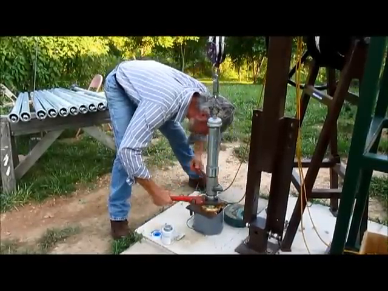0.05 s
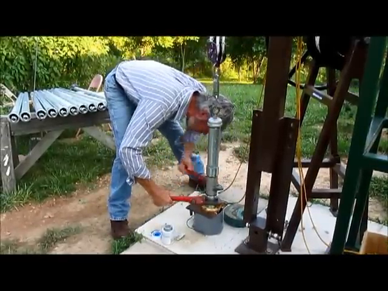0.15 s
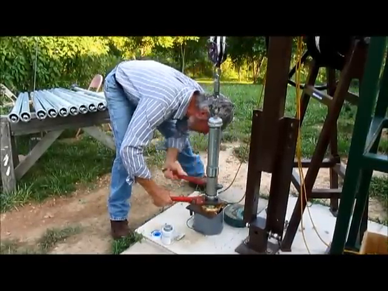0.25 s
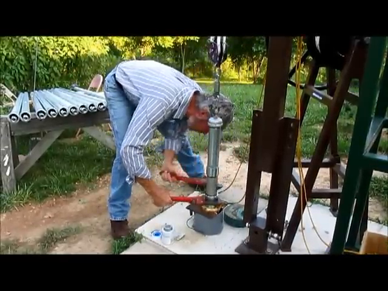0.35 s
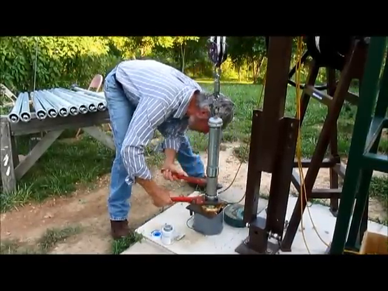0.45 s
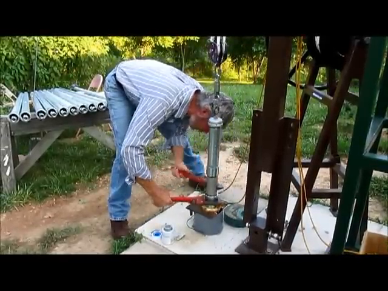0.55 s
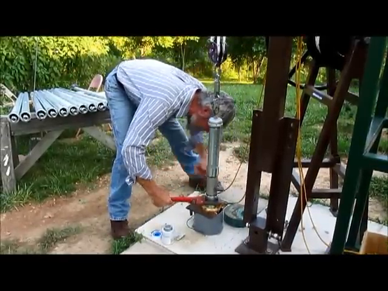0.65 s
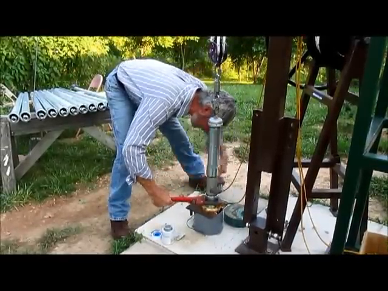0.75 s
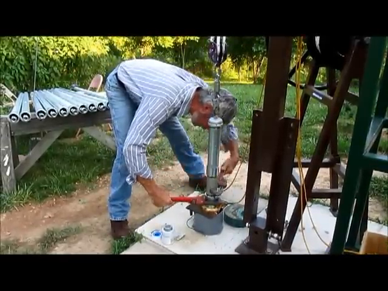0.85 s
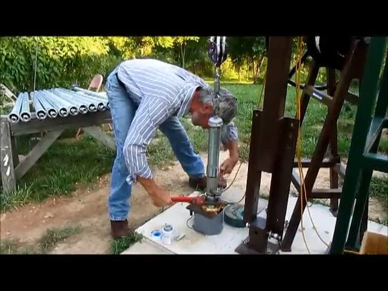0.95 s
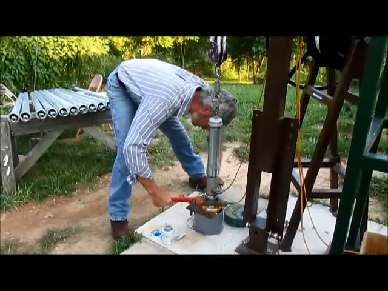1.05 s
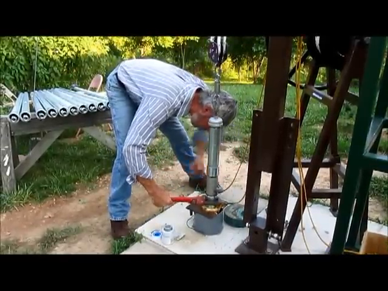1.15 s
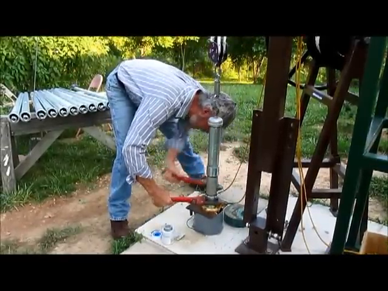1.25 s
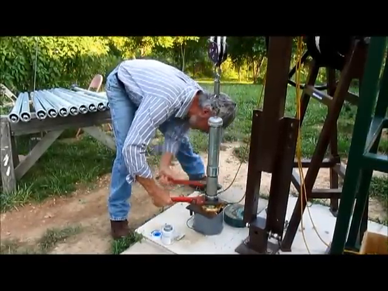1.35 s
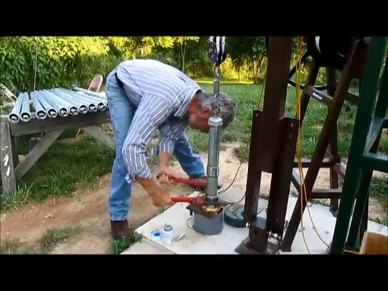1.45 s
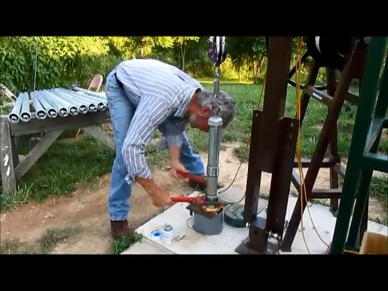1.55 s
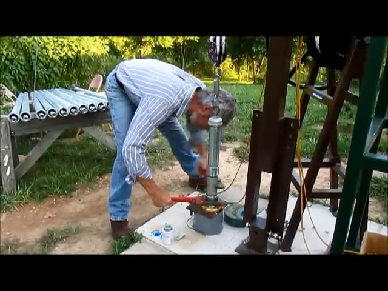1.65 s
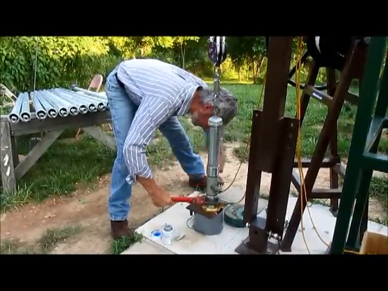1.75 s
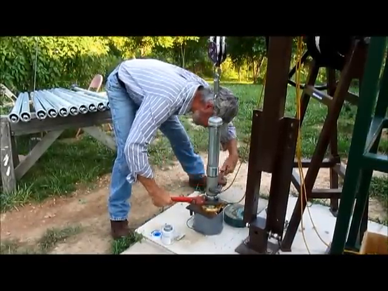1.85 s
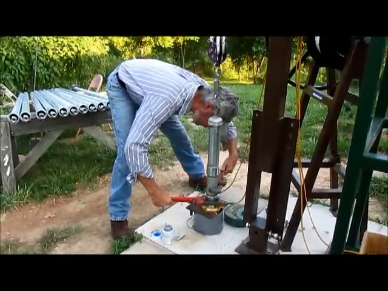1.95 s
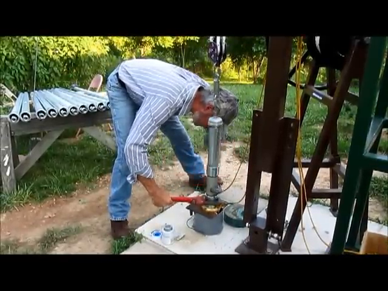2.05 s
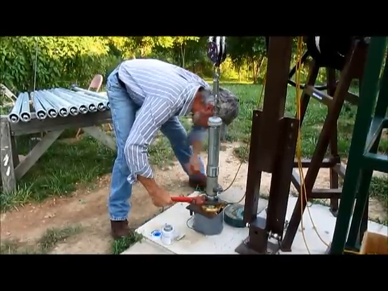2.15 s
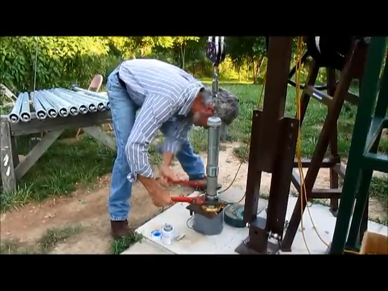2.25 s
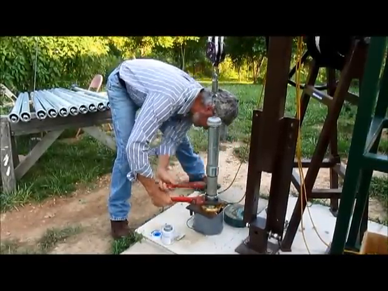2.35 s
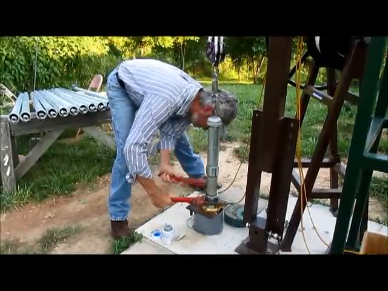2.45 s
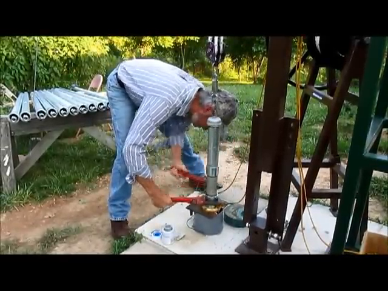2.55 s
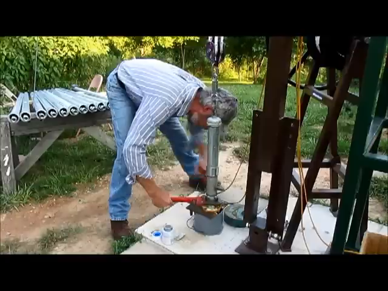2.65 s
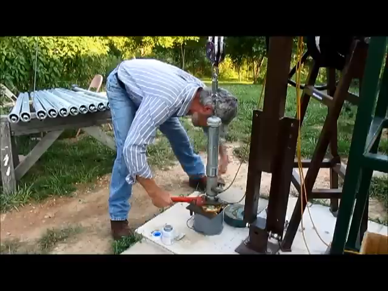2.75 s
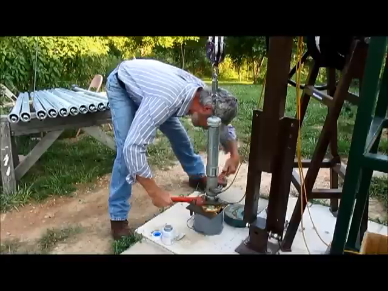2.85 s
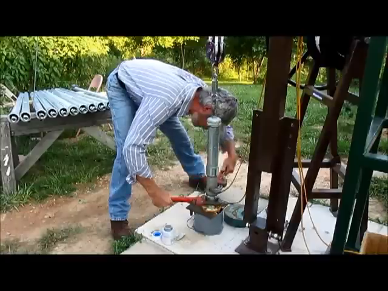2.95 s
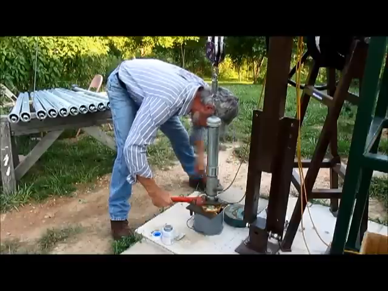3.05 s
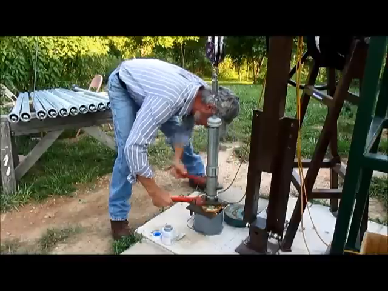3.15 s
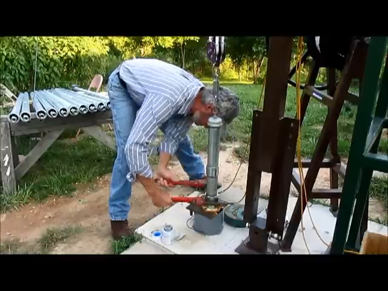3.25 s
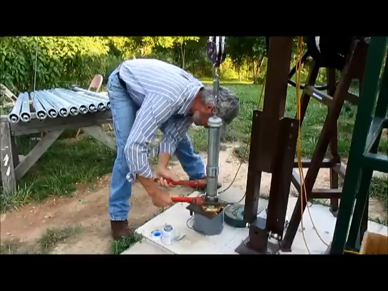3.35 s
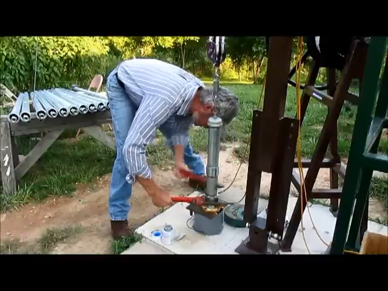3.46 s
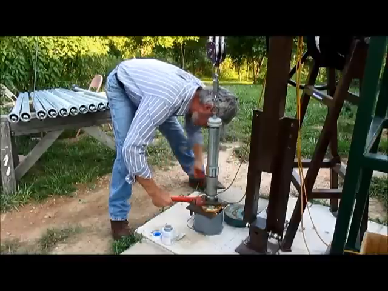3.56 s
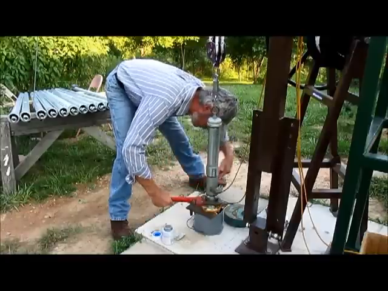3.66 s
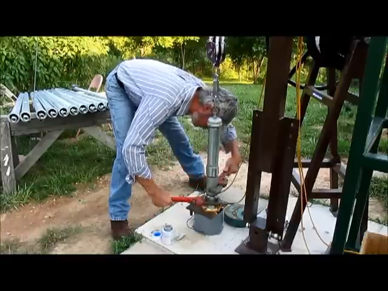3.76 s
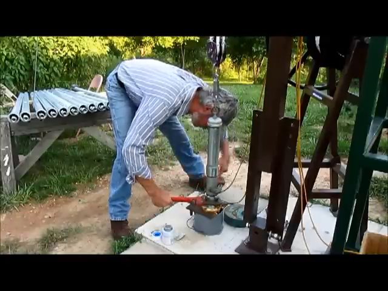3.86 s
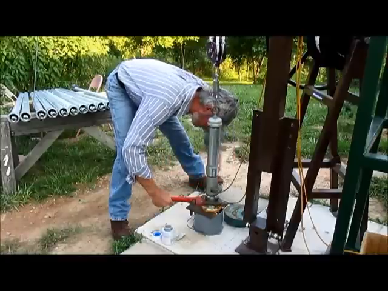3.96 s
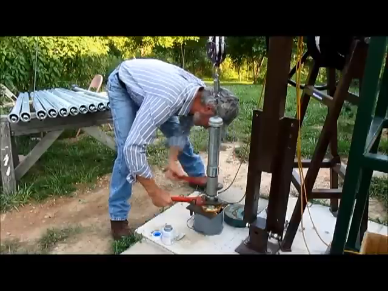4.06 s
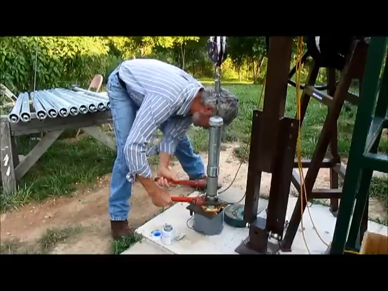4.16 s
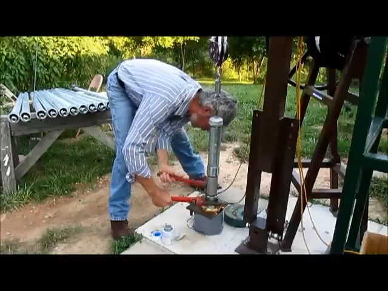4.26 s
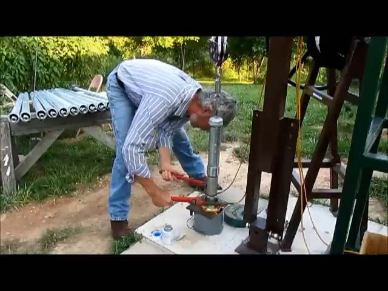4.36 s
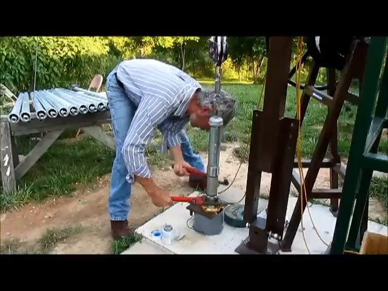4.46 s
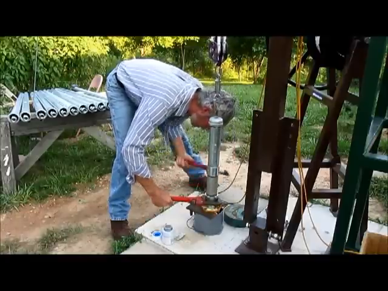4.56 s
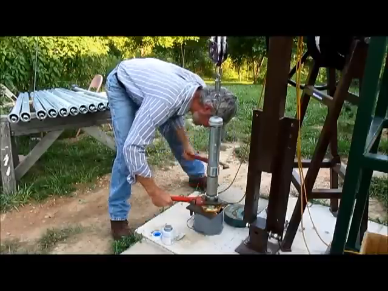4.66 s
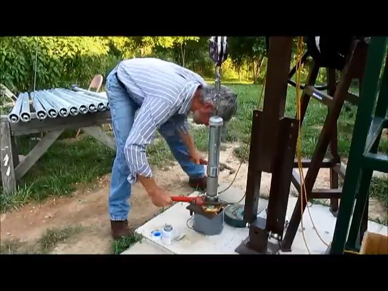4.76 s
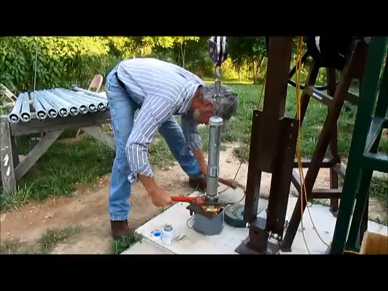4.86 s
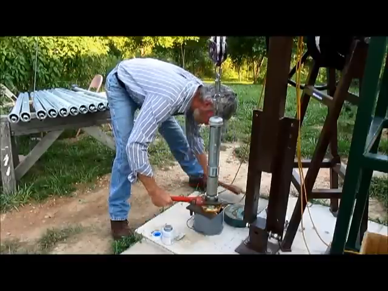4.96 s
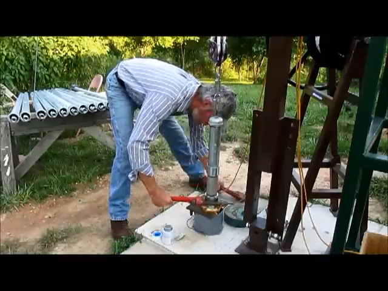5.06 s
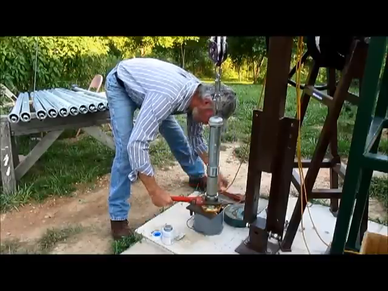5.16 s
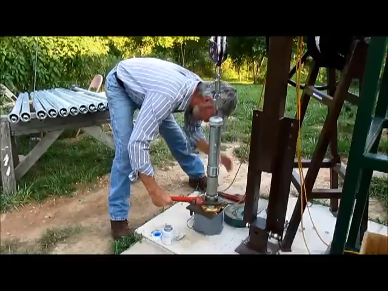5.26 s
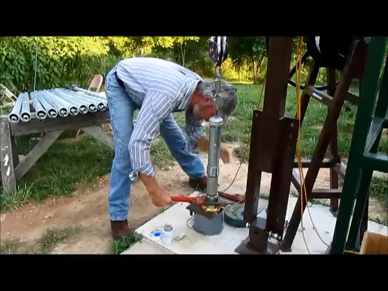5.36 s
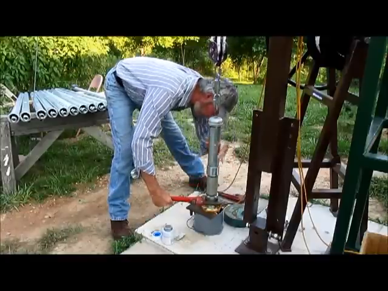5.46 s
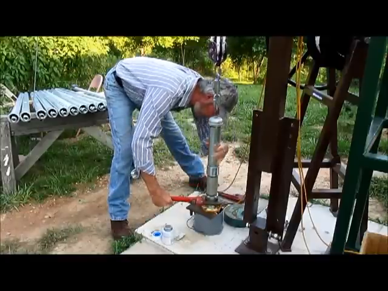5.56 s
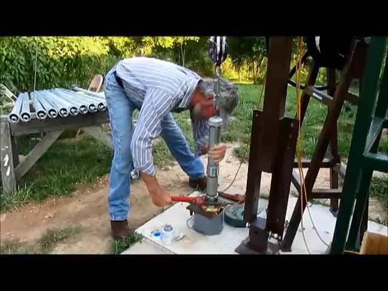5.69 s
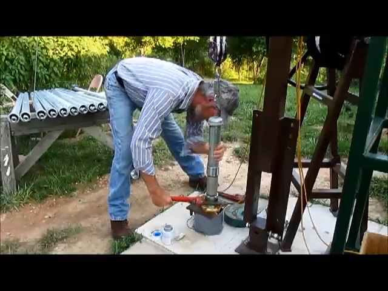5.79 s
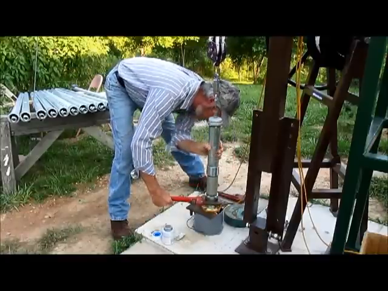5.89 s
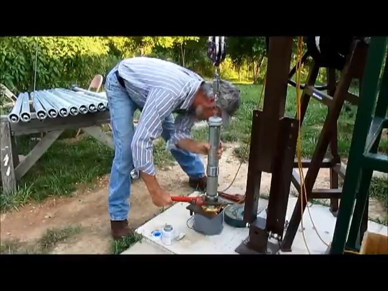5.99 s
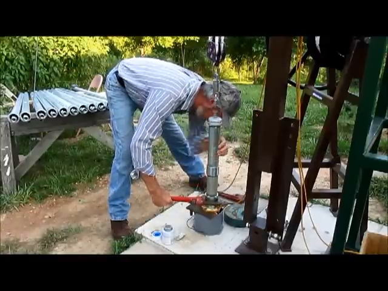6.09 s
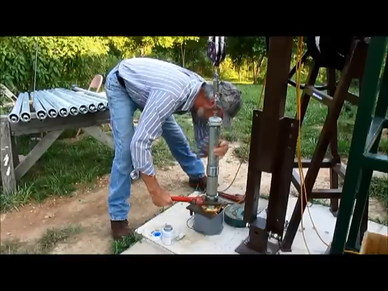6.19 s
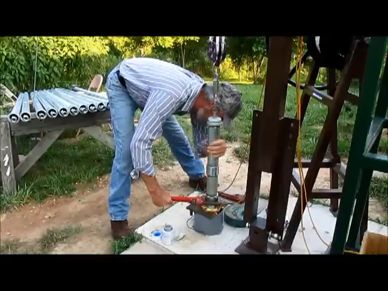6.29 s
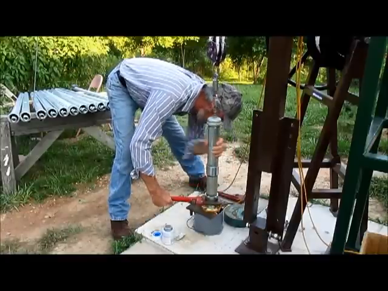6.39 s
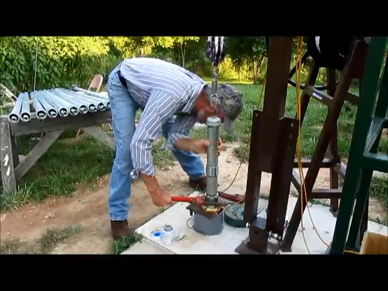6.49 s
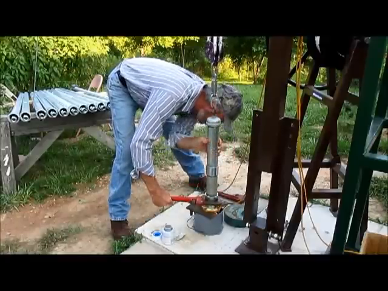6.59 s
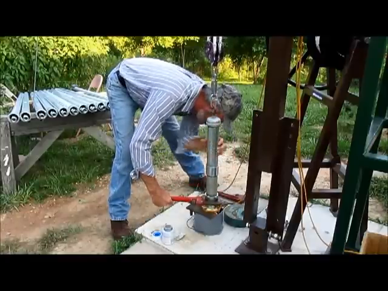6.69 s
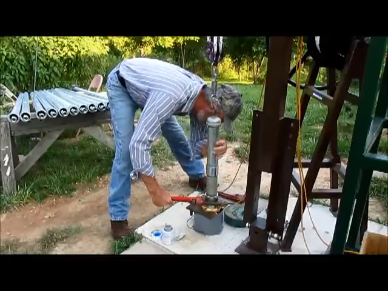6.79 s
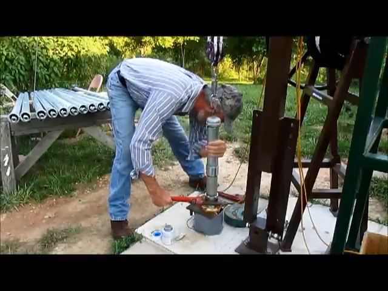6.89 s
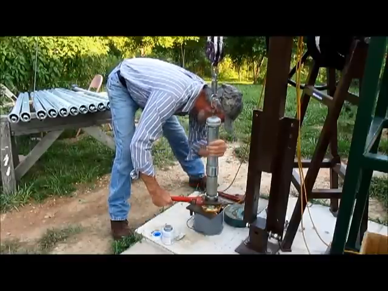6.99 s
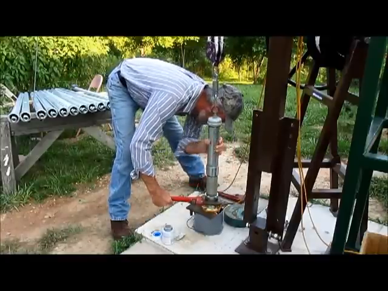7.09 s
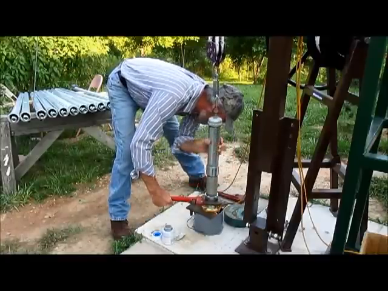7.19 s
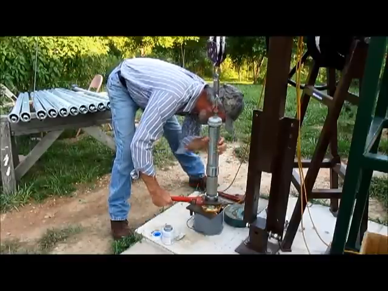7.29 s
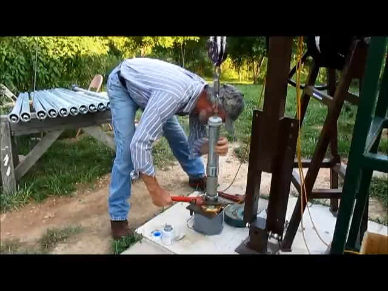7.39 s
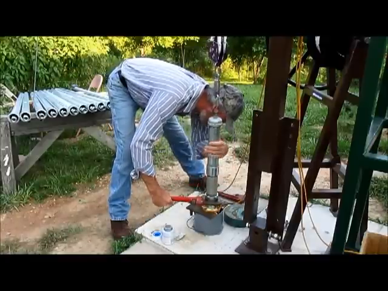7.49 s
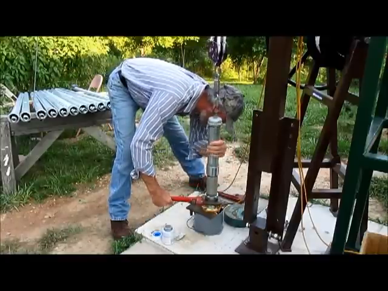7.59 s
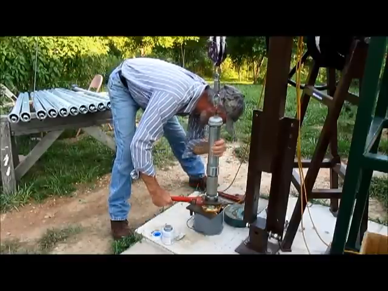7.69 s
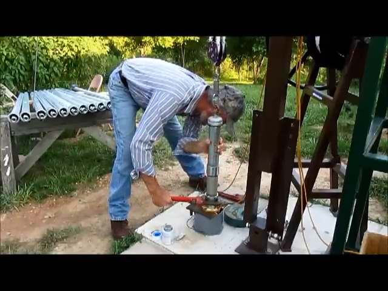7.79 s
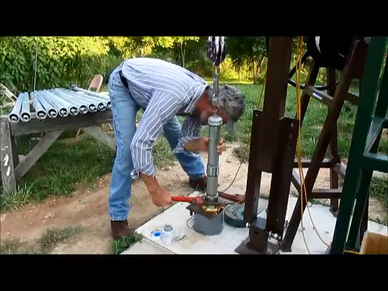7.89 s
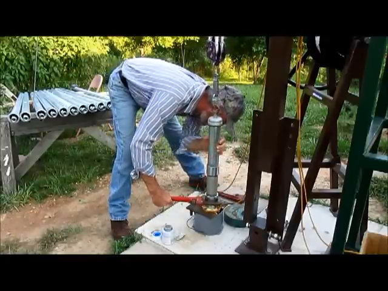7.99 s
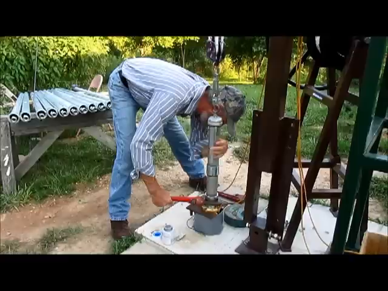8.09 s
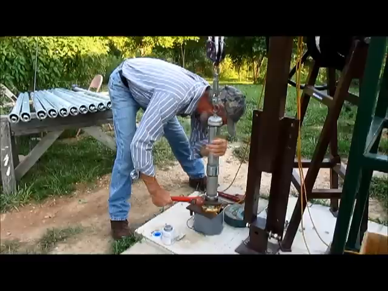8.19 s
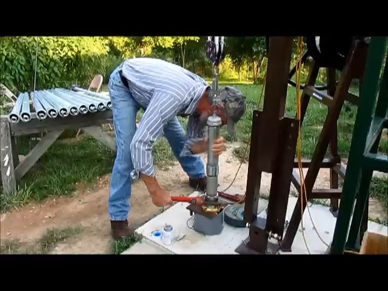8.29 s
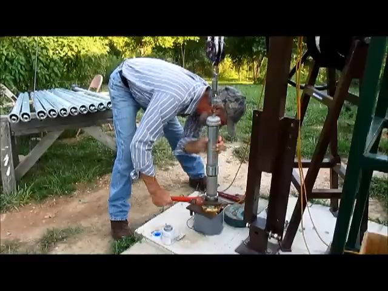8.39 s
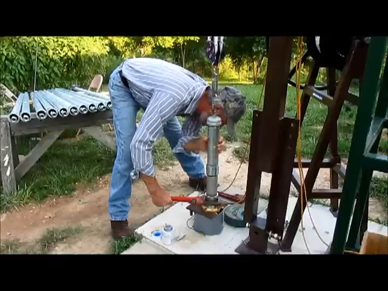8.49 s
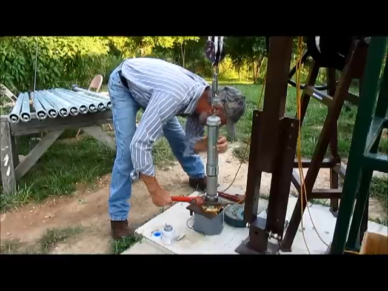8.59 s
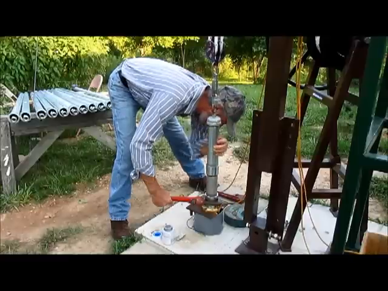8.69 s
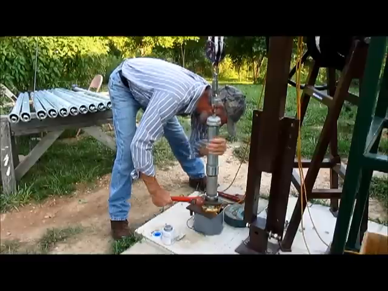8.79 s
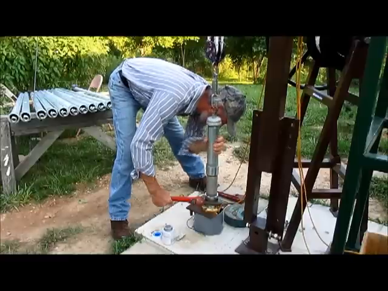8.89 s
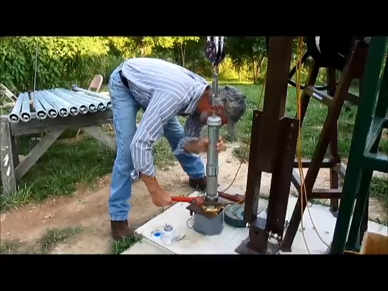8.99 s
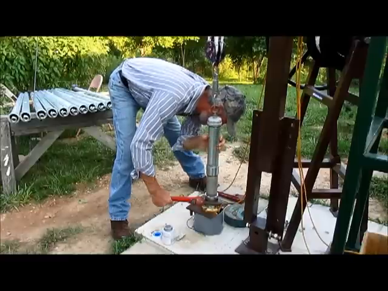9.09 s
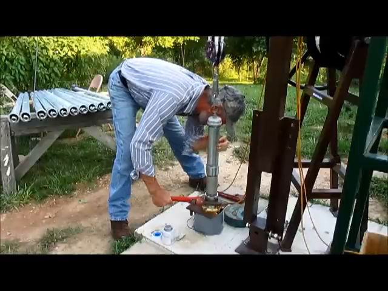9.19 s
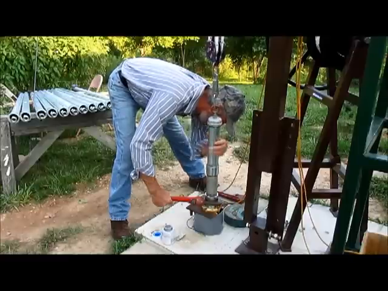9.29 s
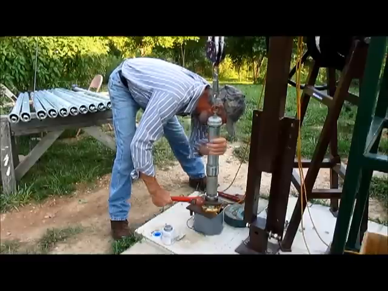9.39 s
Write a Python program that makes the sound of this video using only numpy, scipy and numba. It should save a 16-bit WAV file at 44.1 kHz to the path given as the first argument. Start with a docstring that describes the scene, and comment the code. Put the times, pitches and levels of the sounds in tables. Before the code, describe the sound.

A pipe wrench knocks and rasps round a steel pipe, drops clattering on concrete, then threads scrape softly until a fitting clanks free amid crickets.

```python
"""A pipe wrench is swung four times round a steel well pipe, a brief fifth drag following: noise bursts
through the clamped steel's resonances give the knocks, stick-slip impulses the rasp of the jaws.
It is dropped on a concrete slab, as coloured noise with decaying modes; then a loose fitting is turned
by hand, its threads rubbing as stick-slip friction until it clanks free. Crickets trill as pulsed tones
over noise bands of insects and open air. The gain ducks at loud peaks and creeps back."""
import sys
import numpy as np
from scipy import signal
from scipy.fft import rfft, irfft, next_fast_len
from scipy.io import wavfile
from numba import njit

SR = 44100
rng = np.random.default_rng(int(sys.argv[2]) if len(sys.argv) > 2 else 0)


def wav_out(sig):
    """Save sig, one row per channel (or a flat mono array), as 16-bit PCM at SR to the path in sys.argv[1]."""
    wavfile.write(sys.argv[1], SR, np.round(np.clip(np.atleast_2d(sig).T, -1, 1) * 32767).astype(np.int16))


N = 416289
T = np.arange(N) / SR  # s

# resonances of the wrench clamped on the pipe: f/Hz, bandwidth/Hz, level/dB
CLAMPED_MODES = [(177, 10, -3.5), (238, 30, -0.5), (413, 26, 1.5), (497.4, 34, 7), (770, 120, 6.5),
                 (963, 59, 2.5), (1040, 49, 0), (1272, 120, -7), (1840, 42, -3), (2420, 73, -1.5),
                 (2620, 230, -12), (3120, 85, -13.5), (3695, 110, -11), (4770, 44, -11), (4820, 64, -5.5),
                 (6000, 46, -7), (6650, 160, -2.5)]
# spectrum of the contact force between jaws and pipe: f/Hz, level/dB
CONTACT_SPECTRUM = [(30, -34), (90, -8), (200, 2.5), (500, 2.5), (1500, -1), (3000, -0.5), (5000, 0.5),
                    (7000, -10), (9500, -13.5), (12000, -19.5), (16000, -21)]
# resonances of the rubbing threads: f/Hz, bandwidth/Hz, level/dB
THREAD_MODES = [(79.4, 6.5, -11), (236, 66, -2.5), (484, 96, 2.5), (755, 85, -1.5), (1013, 220, -0.5),
                (1189, 82, 8), (1720, 46, -21), (1780, 27, -3), (2940, 290, 0.5), (3600, 36, -2),
                (4010, 59, -4), (4810, 130, -7)]
# resonances of the loose pipe: f/Hz, bandwidth/Hz, level/dB
PIPE_MODES = [(1011, 8.1, 0.5), (2134, 10.6, -1.5), (2914, 11, -1), (3680, 13, -5)]


def undb(db):
    """Amplitude ratio from decibels: 20 dB for each factor of ten."""
    return 10 ** (np.asarray(db) / 20)


def unit(x):
    """Normalisation to a root-mean-square of 1."""
    return x / np.sqrt(np.mean(x ** 2))


def blow(x, db):
    """Energy scaling: the pulse carries as much energy as 10 ms at this level."""
    return x * undb(db) / np.sqrt(np.sum(x ** 2) / (.01 * SR))


def add(track, s, x):
    """Superposition: adds x to the track from s seconds on."""
    i = int(s * SR)
    track[i:i + len(x)] += x[:N - i]


def colour(x, points):
    """Minimum-phase filter through (f/Hz, level/dB) points, made causal by folding the cepstrum."""
    hz, db = np.transpose(points)
    size = next_fast_len(len(x) + 2048, True)
    size += size % 2
    grid_hz = np.arange(size // 2 + 1) * SR / size
    magnitude = undb(np.interp(np.log(grid_hz + 1), np.log(hz), db))
    cepstrum = irfft(np.log(magnitude))
    cepstrum[1:size // 2] *= 2
    cepstrum[size // 2 + 1:] = 0
    response = np.exp(rfft(cepstrum))
    return irfft(rfft(x, size) * response)[:len(x)]


def band(x, hz, kind):
    """Third-order Butterworth filter: low-, high- or band-pass."""
    return signal.sosfilt(signal.butter(3, hz, kind, fs=SR, output="sos"), x)


def resonate(x, modes, direct_db):
    """Modal response: a force excites parallel resonances and is partly heard directly."""
    out = undb(direct_db) * x
    for hz, width, db in modes:
        b, a = signal.iirpeak(hz, hz / width, fs=SR)
        out = out + undb(db) * signal.lfilter(b, a, x)
    return out


def walk(rate):
    """Slow random modulation: Gaussian knots, rate per second, joined by lines, with a spread near 1."""
    knots = rng.standard_normal(4096)
    return 1.2 * np.interp(T * rate, np.arange(len(knots)), knots)


def slips(rate, spread_db):
    """Stick-slip friction: tiny releases of uneven size at random moments, rate per second."""
    sizes = undb(spread_db * np.minimum(rng.exponential(size=N), 4))
    released = rng.random(N) < rate / SR
    return unit(released * sizes * rng.standard_normal(N))


def surround(points, trim_hz, flicker_db, flicker_rate):
    """Diffuse field: separate mid and side noises, each wavering; the side is slightly less below trim_hz."""
    mid, side = (colour(rng.standard_normal(N), points) * undb(flicker_db * walk(flicker_rate))
                 for _ in range(2))
    low_side = signal.sosfilt(signal.butter(1, trim_hz, fs=SR, output="sos"), side)
    side = side - 0.07 * low_side
    return unit(mid + 0.79 * side * np.array([[1], [-1]]))


def place(x, lag_us, pan_db):
    """Interaural localisation: the left channel lags by lag_us and is pan_db louder than the right."""
    size = next_fast_len(N + 64, True)
    delay = np.exp(-2j * np.pi * np.fft.rfftfreq(size, 1 / SR) * lag_us / 1e6)
    late = irfft(rfft(x, size) * delay, size)[:N]
    return np.array([late * undb(pan_db / 2), x * undb(-pan_db / 2)])


def cricket(stroke_hz, pitch_hz, glide_hz, pulse_s, closing, scatter_db):
    """Stridulation: wings open and close, and each pass of the file sounds a short falling pulse."""
    cycle = np.cumsum(stroke_hz * (1 + 0.02766 * walk(14))) / SR
    out = 0
    for offset in (0, closing):  # in wing cycles
        age = ((cycle + offset) % 1 - .5) / stroke_hz / pulse_s  # in pulse widths
        hz = pitch_hz - glide_hz * np.clip(age, -2, 2) + 45 * walk(60)
        tone = np.sin(2 * np.pi * np.cumsum(hz) / SR)
        out = out + np.exp(-.5 * age ** 2) * tone * undb(scatter_db * walk(40))
    return unit(out)


def insects():
    """Incoherent sum: two near crickets over a wide chorus, and a lower buzz that sinks near the end."""
    # nearest cricket, which falters early on and then holds: t/s, level/dB
    near_level = [(0, -44.5), (.5, -53.5), (1.3, -55), (1.7, -46.5), (5, -47.5), (6.2, -44.5), (6.8, -46.5),
                  (9.4, -46)]
    # spectrum of the distant crickets: f/Hz, relative spectral density/dB
    chorus_spectrum = [(5800, -25), (6600, -12.5), (7000, -4.5), (7250, 3.5), (7480, -9.5), (7750, 0),
                       (7890, -6), (8020, -0.5), (8250, -4), (8600, -13.5), (9200, -20), (9800, -39)]
    # spectrum of the lower insect buzz: f/Hz, relative spectral density/dB
    buzz_spectrum = [(2700, -13.5), (3200, -1), (3480, 4.5), (3800, -4.5), (4600, -1.5), (5300, 4),
                     (5700, 1), (6400, 5), (7500, -41), (9000, -43)]
    near = cricket(stroke_hz=23.5, pitch_hz=7510, glide_hz=70, pulse_s=.0021, closing=.44, scatter_db=2)
    other = cricket(stroke_hz=36.6, pitch_hz=7470, glide_hz=60, pulse_s=.002, closing=.5, scatter_db=4)
    chorus = surround(chorus_spectrum, trim_hz=500, flicker_db=1.0, flicker_rate=99)
    buzz = surround(buzz_spectrum, trim_hz=800, flicker_db=0.8, flicker_rate=60)
    buzz_db = -53.0 - 10 * np.clip((T - 8.72) / 0.071, 0, 1)
    near = near * undb(np.interp(T, *np.transpose(near_level)))
    return (place(near, lag_us=23.2, pan_db=0.0) + other * undb(-51.5)
            + chorus * undb(-46.5) + buzz * undb(buzz_db))


def knocks(low_db=-8, middle_db=-7, high_db=-8, tail_db=-22, tail_s=0.029, rise_s=0.00078,
           ring_s=0.001, ring_db=-5, ring_db_per_ms=2.5, thinnest_hz=170):
    """Impact excitation: teeth crunch into the clamped steel, then the loose jaw rattles faintly."""
    # knocks on the pipe: t/s, middle-band level/dB before the offset middle_db,
    # low and high bands relative to it/dB before their offsets, ring f/Hz, contact decay/ms
    strikes = [(0.597, -21, 0, -14, 1430, 4.9), (0.8162, -24, -1, -26, 3270, 2.4),
               (0.8605, -16, -9, -4, 2460, 14), (0.9324, -23, 5, -4, 3520, 2.8),
               (0.9472, -30, 11, 5, 794, 5.2), (1.0, -30, 2.5, -6, 3720, 4.2),
               (1.5755, -32.5, -4.5, 0, 1260, 3.9), (1.6329, -18, -14, -4.5, 2430, 8.2),
               (1.653, -14, -12, -5.5, 2470, 7.7), (1.7762, -31.5, -5, 0, 3600, 4),
               (1.8225, -17.5, 5, -6, 830, 11.6), (1.8862, -23, 1, -3, 2480, 5.9),
               (1.8943, -18.5, -15, -8, 2390, 6), (1.9493, -18.5, -8, -2.5, 1580, 4.4),
               (1.966, -23, 5.5, -13, 1220, 4), (2.4778, -24, -9.5, -3.5, 3580, 3.4),
               (2.6273, -22.5, -11.5, -4, 2402, 9.2), (2.7408, -28.5, 2.5, -12, 2455, 4.4),
               (2.857, -21, -8, -16, 2434, 3.7), (2.9108, -20, -18, -5.5, 2350, 18),
               (2.94, -19.5, -8.5, -3, 2523, 19), (3.5406, -22, -8, -2, 2347, 15),
               (3.6576, -28.5, 5, -14, 1170, 4), (3.6738, -26, 3.5, -24, 2870, 6.4),
               (3.842, -10.5, -8.5, -3.5, 2576, 14.6), (3.8818, -23, -12, 2, 4970, 3.9),
               (3.935, -32, 0, -24, 1260, 4.5), (4.227, -20, -12.5, -8, 2590, 3.6),
               (4.4915, -35, -15, -15, 2410, 5.4), (9.2212, -19.5, -12.5, 0.5, 4990, 5.4)]
    out, t = np.zeros(N), T[:SR // 4]
    for s, db, low_rel, high_rel, hz, contact_ms in strikes:
        contact = np.exp(-t * 1000 / max(contact_ms, .5)) * (1 - np.exp(-t / rise_s))
        rattle = undb(tail_db) * np.exp(-t / tail_s)
        force = (contact + rattle) * rng.standard_normal(len(t))
        crunch = resonate(colour(force, CONTACT_SPECTRUM), CLAMPED_MODES, direct_db=-7)
        # the point of contact picks out one tone, which builds up during the contact and then dies away
        swell = signal.fftconvolve(contact, np.exp(-t / ring_s))[:len(t)]
        ring = swell * np.sin(2 * np.pi * hz * t)
        # a brief contact only clicks; a longer one lets the steel sing
        sing_db = ring_db + ring_db_per_ms * min(contact_ms - 5, 0)
        x = blow(crunch, 0) + blow(ring, sing_db)
        x = signal.sosfilt(signal.butter(1, thinnest_hz, "high", fs=SR, output="sos"), x)
        # the knock is split into lows, middle and highs, each at its own level
        add(out, s, blow(band(x, 1700, "low"), db + low_rel + low_db))
        add(out, s, blow(band(x, [1700, 4000], "band"), db + middle_db))
        add(out, s, blow(band(x, 4000, "high"), db + high_rel + high_db))
    return out


def yard(x, db, t60):
    """Reverberation: faint, dull scatter from the rig, the ground and the trees, as decaying noise."""
    t = T[:SR // 2]
    envelope = np.exp(-np.log(1000) * t / t60) * (1 - np.exp(-t / 0.0015))
    tails = band(rng.standard_normal((2, len(t))), 4900, "low") * envelope
    return undb(db) * np.array([signal.fftconvolve(x, h / np.linalg.norm(h))[:N] for h in tails])


def skips(spread_db, per_s=38, decay_s=0.007, ring_s=0.012):
    """Intermittent slip: teeth jump unevenly over the steel, each jolt pinging an upper resonance."""
    jolts, pings, t = np.zeros(N), np.zeros(N), T[:SR // 20]
    upper_hz = [hz for hz, _, _ in CLAMPED_MODES if 2300 < hz < 5000]
    chance = rng.random((int(2 * per_s * T[-1]), 3))
    times = np.cumsum(.5 + chance[:, 0]) / per_s
    for s, (_, force, spot) in zip(times[times < T[-1]], chance):
        size = undb(spread_db * (2 * force - 1))
        hz = upper_hz[int(spot ** 2 * len(upper_hz))]  # the lower ones answer more often
        add(jolts, s, size * np.exp(-t / decay_s))
        add(pings, s, size * np.exp(-t / ring_s) * np.sin(2 * np.pi * hz * t))
    return unit(jolts), unit(pings)


def scrapes(body_db=-3, body_jolt_db=-7, steady_teeth_db=-5, ping_db=-1, bite=1.68):
    """Stick-slip under rising pressure: jaws rumble in the pipe and teeth rasp until they let go."""
    # swings: jaws start to drag t/s, let go t/s, final pressure level/dB, rasp relative to it/dB
    swings = [(0.702, 0.948, -31.5, -4), (1.778, 1.973, -33, -4.5), (2.685, 2.938, -32, -0.5),
              (3.57, 3.855, -32, -1.5), (4.443, 4.469, -50.5, 4)]
    pressure_rise_db = 8.5  # gained over one swing
    grip_db_per_s, let_go_db_per_s = 151, 188  # how fast the jaws take hold and lose it
    rubbing = colour(slips(rate=2500, spread_db=1.0), CONTACT_SPECTRUM)
    rubbing = resonate(rubbing, CLAMPED_MODES, direct_db=0.5)
    catching = colour(slips(rate=1700, spread_db=-1.5), CONTACT_SPECTRUM)
    catching = resonate(catching, CLAMPED_MODES, direct_db=-8.5)
    jolts, pings = skips(spread_db=2.5)
    body = unit(band(rubbing, 1600, "low") * (1 + undb(body_jolt_db) * jolts))
    rasp = unit(band(catching, 1700, "high")) * (undb(steady_teeth_db) + jolts)
    teeth = unit(rasp + undb(ping_db) * pings)
    out = np.zeros(N)
    for start, end, db, teeth_db in swings:
        progress = np.clip((T - start) / (end - start), 0, 1)
        push_db = pressure_rise_db * (progress - 1)
        push_db -= grip_db_per_s * np.maximum(start - T, 0)
        push_db -= let_go_db_per_s * np.maximum(T - end, 0)
        push_db = np.maximum(push_db, -120)
        # the rasp follows the pressure more steeply than the rumble
        out += undb(db) * (body * undb(body_db + push_db) + teeth * undb(teeth_db + bite * push_db))
    return out


def dropped_wrench(tail_db=-34, tail_s=0.064, settles_s=5.435):
    """Modal impact: head, then bouncing handle chatter on concrete and ring, damped on lying flat."""
    # landings: t/s, crack level/dB, ring level/dB, most excited f/Hz, other modes relative level/dB,
    # chatter decay/ms, relative level of the slab's thud/dB
    landings = [(5.119, -6.5, -9.5, 4640, -21.5, 4, 2), (5.329, -11, -11, 7345, -9.5, 38, -2.5),
                (5.351, -10, -6, 5400, -21, 4, 1), (5.413, -13.5, -10.5, 7345, -11.5, 4, -5.5)]
    # modes of the free wrench: f/Hz, level/dB, t60/s
    wrench_modes = [(2380, -9, 0.3), (2600, -5, 0.12), (3590, -4, 0.18), (4140, 1.5, 0.1),
                    (4624, -0.5, 0.15), (4712, 14, 0.041), (5390, -4.5, 0.5), (6100, -9, 0.16),
                    (7336, 6, 0.17), (8230, 4.5, 0.13), (12662, -10, 0.29), (14000, 1, 0.09)]
    # spectrum of steel striking concrete: f/Hz, level/dB
    crack_spectrum = [(40, -20), (200, -10), (450, -2.5), (750, 2), (1250, -2.5), (1700, -11), (2150, -1),
                      (2950, -9), (4500, 4), (6500, -2.5), (8000, -7), (14200, -11), (16000, -24)]
    cracks, rings, t = np.zeros(N), np.zeros(N), T[:SR // 2]
    onset = 1 - np.exp(-t / 0.0014)
    for s, crack_db, ring_db, main_hz, other_modes_db, chatter_ms, thud_db in landings:
        contact = np.exp(-t * 1000 / max(chatter_ms, .5)) + undb(tail_db) * np.exp(-t / tail_s)
        spectrum = [(hz, db + thud_db * (500 < hz < 1500)) for hz, db in crack_spectrum]
        crack = colour(onset * contact * rng.standard_normal(len(t)), spectrum)
        add(cracks, s, blow(crack, crack_db))
        for hz, db, t60 in wrench_modes:
            # each landing strikes another spot and so favours another mode
            weight_db = db + other_modes_db * (abs(hz / main_hz - 1) > .06)
            # later landings feed the swing that is already there: the phase runs on
            swing = np.sin(2 * np.pi * hz * (t + int(s * SR) / SR))
            mode = swing * np.exp(-np.log(1000) * t / t60)
            add(rings, s, undb(ring_db + weight_db) * onset * mode)
    lying_flat = undb(-16 * np.clip((T - settles_s) / .04, 0, 1))
    return cracks + rings * lying_flat


def threads(uneven_db=2, catch_ring_db=-12, catch_rise_s=.002, catch_decay_s=.01):
    """Dry friction: threads rub at each twist, catch now and then, and set the loose pipe singing."""
    # twists of the hand: t/s, level/dB, time scale/ms, relative ring of the loose pipe/dB
    twists = [(5.957, -43.5, 43, -13), (6.56, -49.5, 55, -8), (7.149, -55.5, 33, -12), (7.261, -40, 26, 1),
              (7.89, -48.5, 60, -10), (8.466, -43.5, 64, -31), (9.0, -49.5, 51, -12),
              (9.116, -41.5, 23.7, -7)]
    # threads catching with a tick: t/s, level/dB before the tick's rise and decay
    catches = [(6.374, -44.5), (6.589, -38), (7.765, -37), (7.877, -35), (7.967, -36.5), (8.029, -33.5),
               (8.596, -36), (8.62, -45), (8.71, -40)]
    force = band(slips(rate=4200, spread_db=2.0), 4650, "low") * undb(uneven_db * walk(90))
    rub, sing, t = np.zeros(N), np.zeros(N), T[:SR // 8]
    for s, db, scale_ms, ring_db in twists:
        age = np.clip((T - s) * 1000 / scale_ms, -4, 30)
        # the thread catches quickly and lets go slowly
        twist = undb(db) * np.exp(.5 * (1 - 1.6 * age - np.exp(-1.6 * age)))
        rub += twist
        sing += undb(ring_db) * twist
    for s, db in catches:
        tick = undb(db) * np.exp(-t / catch_decay_s) * (1 - np.exp(-t / catch_rise_s))
        add(rub, s, tick)
        add(sing, s, undb(catch_ring_db) * tick)
    # rubbing is soft and reaches mainly the lowest mode of the pipe
    parts = ((force, rub, THREAD_MODES, -17), (band(force, 1060, "low"), sing, PIPE_MODES, -50))
    out = np.zeros(N)
    for drive, push, modes, direct_db in parts:
        steady_level = resonate(drive, modes, direct_db).std()
        out += resonate(drive * push, modes, direct_db) / steady_level
    return out


def fitting_free(free_s=9.2207, ring_db=-39.5, rub_db=-37.5, rub_s=0.042):
    """Free vibration: off its last thread, the pipe rings on while the thread ends graze each other."""
    out, t = np.zeros(N), T[:SR // 2]
    noise = band(rng.standard_normal(len(t)), 4200, "low")
    graze = unit(resonate(noise, THREAD_MODES, direct_db=-20))
    ring = sum(undb(db) * np.sin(2 * np.pi * hz * t) * np.exp(-np.pi * width * t)
               for hz, width, db in PIPE_MODES)
    add(out, free_s, undb(rub_db) * graze * np.exp(-t / rub_s) + undb(ring_db) * ring)
    return out


def scene():
    """Superposition: steelwork just right of centre, its scatter from the yard, insects and open air."""
    # spectrum of the open air: f/Hz, relative spectral density/dB
    air_spectrum = [(25, -8), (50, -1), (85, 4.5), (150, 0), (400, 1), (800, -0.5), (1200, -2), (2100, -16),
                    (3200, -12), (6000, -25), (10200, -39), (11500, -14), (16000, -19.5)]
    steel = knocks() + scrapes() + dropped_wrench() + threads() + fitting_free()
    air = surround(air_spectrum, trim_hz=2500, flicker_db=.9, flicker_rate=12)
    direct = place(steel, lag_us=20, pan_db=-2.0)
    return direct + yard(steel, db=-17, t60=0.14) + insects() + air * undb(-55.5)


@njit
def ducking(over_db, attack, recover_db):
    """Peak-following gain reduction in dB: quick rise to the excess level, steady fall."""
    out, cut = np.zeros(len(over_db)), 0.
    for i in range(len(over_db)):
        if over_db[i] > cut:
            cut += attack * (over_db[i] - cut)
        else:
            cut = max(cut - recover_db, 0.)
        out[i] = cut
    return out


def record(dry, threshold_db=-8, attack_s=0.00039, recover_db_per_s=8, top_hz=15850):
    """Dynamic compression: gain control by the louder channel, rounded peaks and a steep top cut."""
    over_db = 20 * np.log10(np.abs(dry).max(axis=0) + 1e-9) - threshold_db
    held = dry * undb(-ducking(over_db, 1 / (attack_s * SR), recover_db_per_s / SR))
    top_cut = signal.ellip(10, .2, 80, top_hz, fs=SR, output="sos")
    return signal.sosfilt(top_cut, np.tanh(held))


dry = scene()
out = record(dry)
wav_out(out)
```